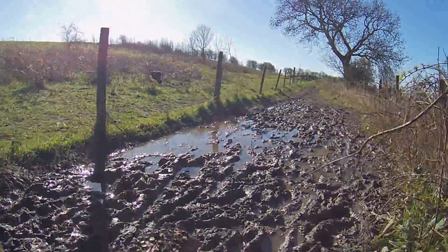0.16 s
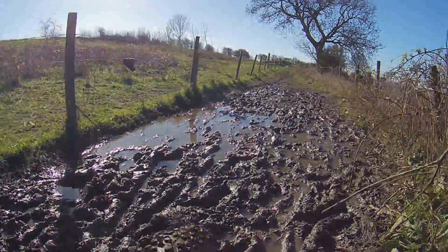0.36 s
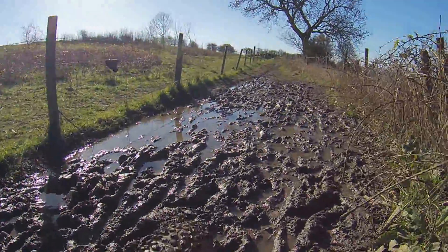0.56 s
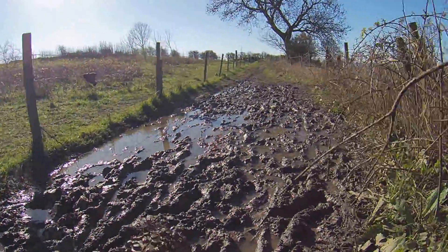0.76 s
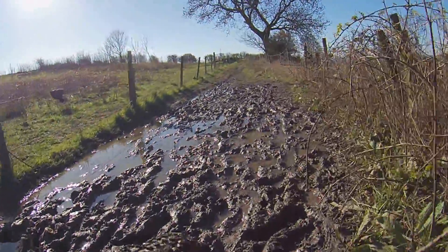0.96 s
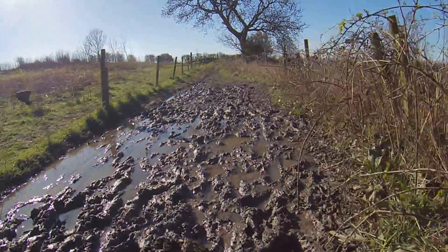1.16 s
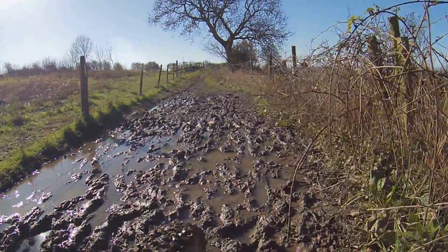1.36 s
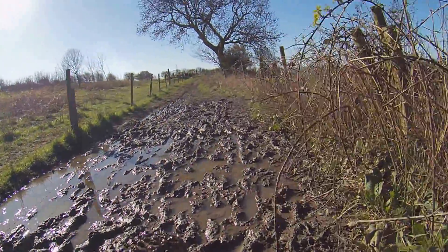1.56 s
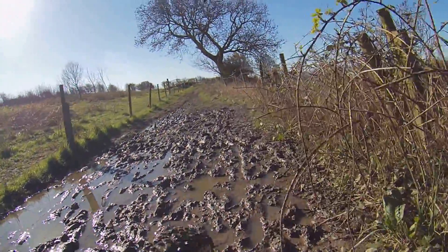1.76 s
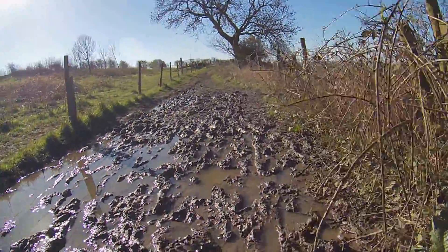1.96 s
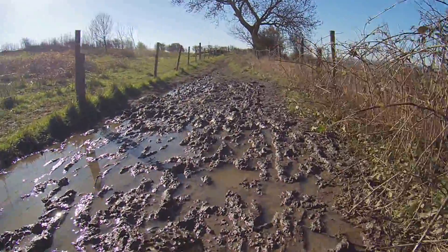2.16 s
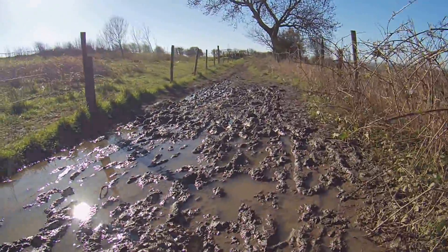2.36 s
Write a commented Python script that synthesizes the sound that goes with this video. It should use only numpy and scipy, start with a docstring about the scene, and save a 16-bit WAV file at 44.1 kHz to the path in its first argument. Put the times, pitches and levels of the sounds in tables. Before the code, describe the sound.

Bicycle tyres roll through deep wet mud, heard close and dry: faint crackle first, then a dense flurry of sharp snaps with dull frame knocks, thinning to sparse ticks and pops over faint wind rumble.

```python
"""Bicycle through deep mud

A bicycle is eased through deep wet mud beside a bramble hedge, heard from close by.
Mud and twigs snap and rasp in short noise bursts; damped tones thud through the frame and pop
as air pockets. Tiny noise grains crackle with the rolling over a low churn of mud;
steady coloured noise gives wind rumble and a faint hiss."""
import sys
import numpy as np
from scipy import signal
from scipy.fft import rfft, irfft, next_fast_len
from scipy.io import wavfile
from scipy.ndimage import uniform_filter1d, map_coordinates

SR = 44100
rng = np.random.default_rng(int(sys.argv[2]) if len(sys.argv) > 2 else 0)


def invert_db(level):
    """Linear amplitude ratio for a level in decibels (20 dB per decade), elementwise."""
    return 10 ** (np.asarray(level, dtype=float) / 20)


def master(y):
    """Save y as 16-bit WAV."""
    cut = np.clip(np.atleast_2d(y).T, -1, 1)
    pcm = np.round(cut * 32767)  # scale
    wavfile.write(sys.argv[1], SR, pcm.astype(np.int16))


N = 105840  # samples in the scene


def unit(x):
    """Scaled to rms 1."""
    return x / np.sqrt(np.mean(x ** 2) + 1e-20)


def curve(rows):
    """A (t/s, value) table, one value per sample."""
    s, value = np.transpose(rows)
    return np.interp(np.arange(N) / SR, s, value)


def wobble(rate):
    """A smooth random curve, rate knots a second."""
    return map_coordinates(rng.standard_normal(N // 20), [np.arange(N) * rate / SR])


def coloured(x, spectrum):
    """x filtered through (f/Hz, level/dB) points; a single pulse keeps its height."""
    m = next_fast_len(N)
    f, db = np.transpose(spectrum)
    log_hz = np.log(np.fft.rfftfreq(m, 1 / SR) + 1)
    gain = invert_db(np.interp(log_hz, np.log(f + 1), db))
    return irfft(rfft(x, m) * gain / gain.mean(), m)[:N]


def noise(spectrum):
    """Noise of rms 1 with the given colour."""
    return unit(coloured(rng.standard_normal(N), spectrum))


def mottled(x, patchy_db):
    """Colour that shifts from moment to moment, in patches a few ms long and a kHz or two wide."""
    z = signal.stft(x, nperseg=128)[2]
    field = uniform_filter1d(rng.standard_normal(z.shape), size=5, axis=0)  # across frequency
    field = uniform_filter1d(field, size=4, axis=1)  # across time
    gain = invert_db(patchy_db * unit(field))
    return signal.istft(z * unit(gain), nperseg=128)[1][:N]


def add(track, s, piece):
    """Mix a piece into a track at s seconds."""
    part = track[..., round(s * SR):][..., :piece.shape[-1]]
    part += piece[..., :part.shape[-1]]


def three_levels(db, mid_db, low_db):
    """Gains of the bright, middle and low parts, the last two given over the bright one."""
    return invert_db([[db], [db + mid_db], [db + low_db]])


# Colours of the bright, middle and low parts of a burst: f/Hz, level/dB
BRIGHT = [(4000, -64), (6500, -14.5), (8000, -5.5), (10000, -6.5), (13000, -1.5), (15000, -1)]
DULL = [(1000, -8), (2000, -3.5), (4000, -3), (6000, -1), (9000, -10)]
LOW = [(120, -5), (350, 4), (800, 2.5), (1500, 0), (2200, -3.5), (4000, -15.5)]


def burst_parts():
    """The bright, middle and low noises that snaps and rasps share."""
    return np.array([noise(colour) for colour in (BRIGHT, DULL, LOW)])


# Snaps of mud and twigs: t/s, level/dB of the bright part, middle over it/dB, low over it/dB
SNAPS = [(0.1515, -26.5, -7, -7), (0.2069, -30, -26, -7), (0.2241, -17.5, -6.5, -13.5),
         (0.242, -15.5, -27, -35), (0.2519, -22, -27, -36), (0.3202, -13, -10, -37),
         (0.3372, -18, -4.5, -17), (0.3814, -28, -26, -27), (0.4327, -28.5, 5.5, -34),
         (0.494, -29, -14, 9.5), (0.5058, 0, -1.5, -10.5), (0.511, -22, -1, 2.5),
         (0.5182, -13.5, 2.5, -14.5), (0.548, -15.5, -1, -22), (0.5565, -10.5, 0.5, -6.5),
         (0.566, -34, -9, 10), (0.6039, -7, -9, -9.5), (0.6077, -9, -23, -29), (0.6133, -14, -17, -5),
         (0.6166, -14, 0.5, -10), (0.636, -16, -9, -23), (0.6437, -24, -12, -34), (0.6494, -1.5, -20, -31),
         (0.658, -26, -10, -22), (0.6718, -21, -1, -25), (0.684, -15, -8, -34), (0.6985, -25, -17, 2),
         (0.7417, -7, -13, -12.5), (0.7476, -7, -8, -5), (0.7528, -33, -24, -16), (0.7577, -7, -17, -24),
         (0.7682, -16, -15, -29), (0.7798, -4, -7.5, -12), (0.797, -22, -21, -20), (0.804, -16, -24, -25),
         (0.842, -20, -18, -6), (0.876, -21, -23, -31), (0.901, -3, -15, -14.5), (0.905, -3.5, -11, -20),
         (0.9072, -16, -28, -33), (0.9271, -9, -24, -18), (0.936, 2, -16, -36), (0.9555, -19.5, -25, -9),
         (0.9828, -7, -25, -15), (0.9859, 6.5, -18.5, -53), (0.9939, -6, -9, -46), (1.0082, -32, 6, -0.5),
         (1.0233, -29, -11, -4), (1.0594, -2.5, -2, -26), (1.076, -16.5, -26, -18), (1.081, -36, -22, -31),
         (1.09, -9.5, -24, -40), (1.1206, -17.5, -20, -37), (1.1648, -20.5, -31, -40),
         (1.227, -23, -27, -18), (1.2924, -26.5, -5, -1), (1.309, -32, -20, -38), (1.3251, -26.5, 3, -1.5),
         (1.4405, -15.5, -13, -32), (1.4892, -13, -36, -27.5), (1.706, -26, -30, -30),
         (1.727, -31, -30, -24), (1.744, -27.5, -30, -30), (1.798, -21, -29, -14.5), (2.088, -24, -5, -30),
         (2.1016, -18, -1.5, -23), (2.157, -27, -25, -21), (2.1857, -21, -24, -17.5),
         (2.2079, -17.5, -30, -30), (2.2325, -24, -19, -27), (2.2568, -21.5, -8, -27),
         (2.2858, -26.5, -11, -27), (2.3396, -21.5, -20, -35), (2.356, -30, -21, -28),
         (2.3837, -17.5, -8, -49)]
# Decay by 60 dB of the bright, middle and low parts, one row each: t60/s
SNAP_T60_S = [
    [0.01],
    [0.0097],
    [0.018],
]


def snaps(parts):
    """Breaking mud and twigs: noise that starts sharply and dies fast, topped by one sharp break."""
    attack_s, body_db, needle_db = 0.0012, -7, -1.5
    t = np.arange(SR // 4) / SR
    crack = invert_db(-60 * t / np.array(SNAP_T60_S) + body_db) * np.minimum(t / attack_s, 1) ** 2
    envelope, needle = np.zeros((3, N)), np.zeros((3, N))
    way = np.sign(rng.standard_normal(N))  # each break pushes either way
    for s, db, mid_db, low_db in SNAPS:
        gains = three_levels(db, mid_db, low_db)
        add(envelope, s, gains * crack)
        add(needle, s + attack_s, way[round(s * SR)] * gains)  # one sample, as the attack ends
    local_power = np.abs(uniform_filter1d(parts ** 2, size=60))
    even = parts / np.sqrt(local_power + 0.09)  # evens out the noise so snap sizes stay steady
    breaks = sum(coloured(x, colour) for x, colour in zip(needle, (BRIGHT, DULL, LOW)))
    return invert_db(needle_db) * breaks + np.sum(envelope * even, 0)


# Rasps: start t/s, length/s, level/dB of the bright part, middle over it/dB, low over it/dB
RASPS = [(0.332, 0.0753, -47, -11, -6), (0.523, 0.007, -39, 1, -7), (0.54, 0.0078, -31.5, 2.5, -24),
         (0.569, 0.037, -47.5, 6.5, 6.5), (.606, 0.005, -21.5, -15, -14.5),
         (0.622, 0.046, -35.5, -11.5, -7), (0.642, 0.036, -28, -6.5, -40), (0.674, 0.031, -34, -26, -19),
         (0.738, 0.0044, -30, 4.5, 3), (0.743, 0.041, -35.5, -6, -5.5), (0.757, 0.028, -26.5, -14, -16.5),
         (0.796, 0.029, -32.5, -2, -9), (0.852, 0.012, -36, -4.5, -12), (0.871, 0.011, -30.5, -10, -21),
         (0.885, 0.034, -31.5, -14, -12.5), (0.92, 0.03, -39, -11.5, -9), (0.979, 0.018, -33.5, -22, -24),
         (1.064, 0.027, -41.5, -10, -20), (1.206, 0.18, -45.5, -8.5, -18.5), (1.435, 0.059, -47, -5, -26),
         (1.494, 0.037, -48.5, -1.5, -5), (1.563, 0.031, -62.5, 3, 4.5), (1.827, 0.059, -58.5, -4, -3),
         (1.935, 0.063, -53, -6.5, -14), (2.005, 0.035, -47, -12, -12.5), (2.09, 0.049, -46.5, -8.5, -22)]


def rasps(parts):
    """Scraping mud and twigs: held noise with short ramps, roughened by fast random level swings."""
    edge_s, grit_db = 0.0033, 3.5
    t = np.arange(SR // 4) / SR
    envelope = np.zeros((3, N))
    for s, length, db, mid_db, low_db in RASPS:
        hold = np.clip(np.minimum(t, length + edge_s - t) / edge_s, 0, 1)
        add(envelope, s, three_levels(db, mid_db, low_db) * hold)
    shared = grit_db * wobble(700) + 1.2 * wobble(120)
    separate = 1.42 * np.array([wobble(150) for part in parts])
    return mottled(np.sum(envelope * invert_db(shared + separate) * parts, 0), patchy_db=3.0)


def tones(rows, rise):
    """Damped resonances with a soft start; over one t60 the pitch climbs by the share 2 * rise."""
    soft_s = 0.00069
    out, t = np.zeros(N), np.arange(SR // 3) / SR
    for s, db, hz, t60 in rows:
        envelope = invert_db(db - 60 * t / t60) * (1 - np.exp(-t / soft_s))
        add(out, s, envelope * np.sin(2 * np.pi * hz * t * (1 + rise * t / t60)))
    return out


# Thuds through the frame: t/s, level/dB ahead of the soft start, f/Hz, t60/s
THUDS = [(.506, -24.5, 140, 0.07), (.555, -27.5, 270, 0.022), (.588, -28.5, 196, 0.059),
         (.5995, -10, 470, 0.021), (.592, -23, 343, 0.054), (.64, -29.5, 189, 0.043),
         (.7, -20.5, 264, 0.011), (.737, -25.5, 239, 0.053), (.748, -28.5, 99, 0.1),
         (.775, -27.5, 96.6, 0.23), (.8, -29, 272, 0.047), (.9, -27.5, 237, 0.097),
         (1.056, -31, 114, 0.049), (1.4, -36.5, 60, 0.064), (1.525, -39.5, 62.3, 0.12)]


def thuds():
    """Knocks ringing through the frame as damped tones of fixed pitch."""
    return tones(THUDS, rise=0)


# Air pockets popping: t/s, level/dB ahead of the soft start, starting f/Hz, t60/s
POPS = [(.225, -47, 810, 0.033), (.545, -20.5, 1470, 0.021), (.574, -27, 1800, .02), (.601, -19, 580, 0.02),
        (.809, -20, 2100, 0.015), (2.19, -36, 3000, 0.012), (1.232, -36, 725, 0.016),
        (1.372, -33.5, 1010, 0.027), (1.396, -35.5, 1060, 0.018), (1.461, -26.5, 4090, 0.016),
        (1.566, -32, 1600, 0.0081), (1.58, -36, 1600, 0.011), (1.59, -36, 1600, 0.0056),
        (2.035, -43, 657, 0.052), (2.103, -26.5, 3400, 0.0076), (2.105, -43, 690, 0.016)]


def pops():
    """Air pockets bursting in the mud as short damped tones that climb slightly."""
    return tones(POPS, rise=0.01)


# Crackle that follows the rolling: t/s, level/dB
ROLLING = [(0, -43.5), (.05, -46.5), (.12, -61), (.16, -48), (.29, -41.5), (.48, -41), (.7, -50),
           (.725, -43.5), (.85, -46.5), (.97, -42), (1.1, -45.5), (1.18, -45), (1.23, -39.5), (1.38, -36.5),
           (1.42, -44.5), (1.55, -49), (1.68, -56), (1.9, -51.5), (2.06, -47.5), (2.2, -47.5),
           (2.33, -51.5), (2.4, -45.5)]


def crackle():
    """Wet grit parting from the treads: random tiny snaps on a fizzing bed."""
    grains_per_s, spread_db, grain_t60_s = 220, 4, 0.004
    bed, dull_db = 0.4, -8  # bed share of the envelope; level of the dull noise
    chance, size = rng.random(N), rng.exponential(size=N)
    hits = np.clip((grains_per_s / SR - chance) * SR / 20, 0, 1)
    hits = hits * invert_db(spread_db * np.minimum(size, 3.5))
    decay = invert_db(-60 * np.arange(SR // 40) / SR / grain_t60_s)
    grains = signal.fftconvolve(hits, decay)[:N]
    shape = np.hypot(unit(grains) * (1 - bed), bed * invert_db(5.8 * wobble(30.65)))
    grit = noise(BRIGHT[:1] + BRIGHT[-2:])  # the finest grit has only the top of the colour
    dull = invert_db(dull_db + 0.61 * wobble(25.32)) * noise(DULL)
    fizz = shape * grit + np.sqrt(shape) * (0.9 * noise(BRIGHT) + dull)
    return invert_db(curve(ROLLING)) * mottled(fizz, patchy_db=4.5)


# Low churn of the mud over time: t/s, level/dB
SQUELCH = [(0, -54), (.33, -52.5), (.48, -46), (.6, -40), (.72, -43.5), (.8, -47), (.95, -43.5),
           (1.12, -52), (1.5, -57), (1.7, -55.5), (2.4, -55.5)]
# Colour of the churn: f/Hz, level/dB
CHURN = [(60, 1.5), (100, 2.5), (250, 3), (500, -15.5), (900, -15), (2000, -68)]


def mud():
    """The low churn of mud closing round the tyres: dark noise with a wavering level."""
    return invert_db(curve(SQUELCH) + 2.22 * wobble(34.44)) * noise(CHURN)


# Colour of wind rumble and hiss: f/Hz, level/dB
AIR = [(12, -30), (20, 0.5), (100, -3.5), (190, -6), (300, -20.5), (430, -21.5), (740, -32.5),
       (1900, -21.5), (3600, -32), (6000, -36.5), (16000, -30.5)]


def air():
    """Wind rumble and far hiss: one coloured noise with a slow, slight sway in level."""
    return invert_db(-49 + 0.46 * wobble(3.33)) * noise(AIR)


def scene():
    """Everything close and dry, in mono."""
    parts = burst_parts()
    bursts = snaps(parts) + rasps(parts)
    return (bursts + thuds() + pops() + crackle() + mud() + air())[None]


def roll_off(x):
    """The treble ends steeply here."""
    return signal.sosfilt(signal.butter(12, 16970, fs=SR, output="sos"), x)


def record(dry):
    """Soft saturation towards full scale, then a steep band limit."""
    top_hz = 15950
    m = next_fast_len(N)
    spectrum = rfft(np.tanh(dry), m)
    mix = irfft(spectrum * (np.fft.rfftfreq(m, 1 / SR) < top_hz), m)[:, :N]
    return roll_off(mix)


dry = scene()
out = record(dry)
master(out)
```